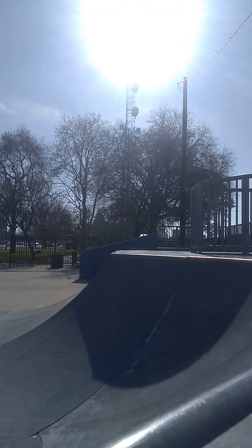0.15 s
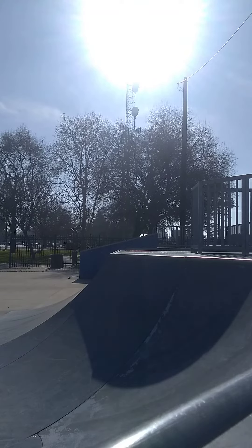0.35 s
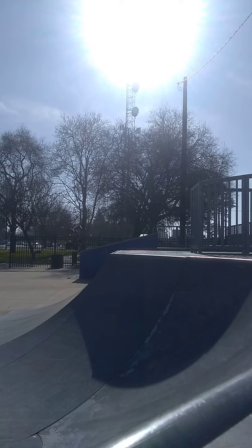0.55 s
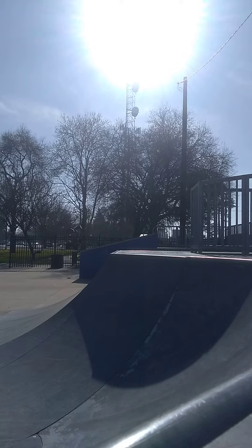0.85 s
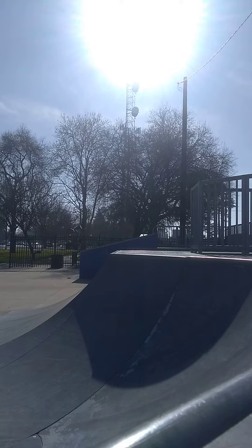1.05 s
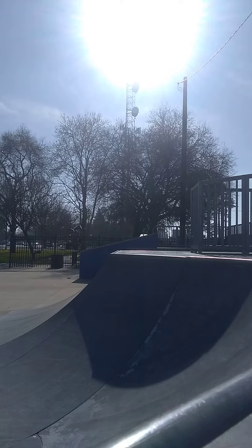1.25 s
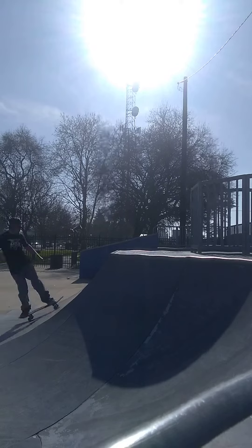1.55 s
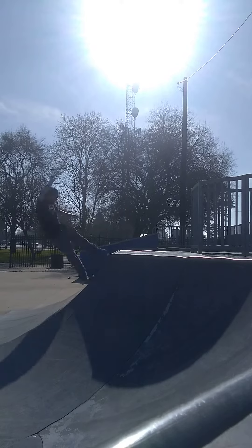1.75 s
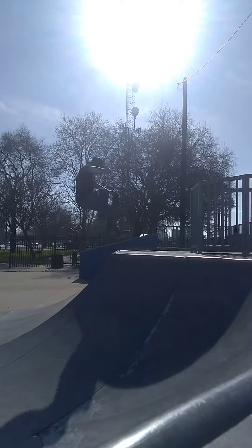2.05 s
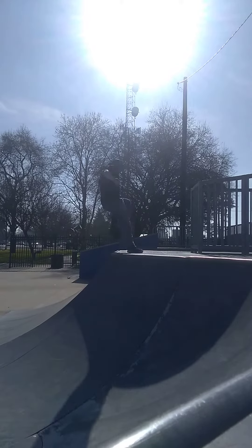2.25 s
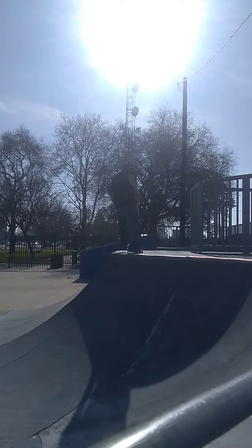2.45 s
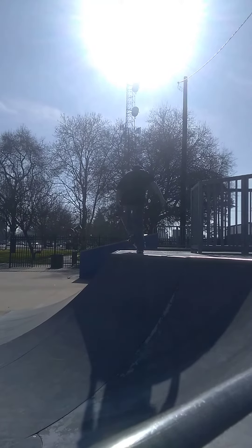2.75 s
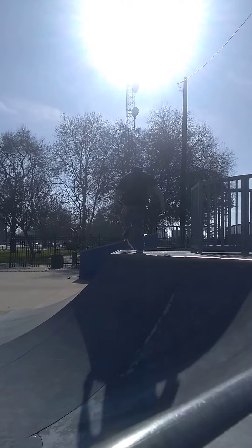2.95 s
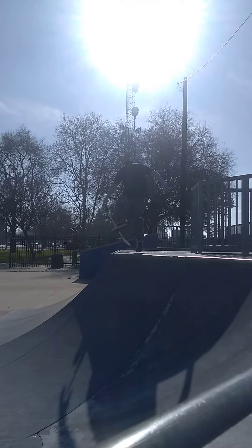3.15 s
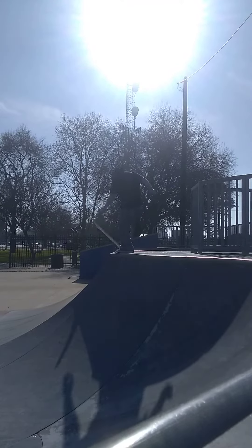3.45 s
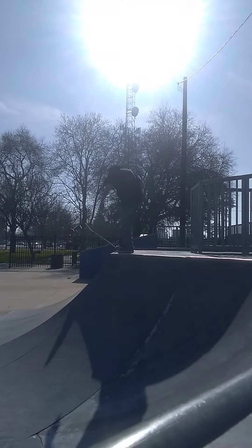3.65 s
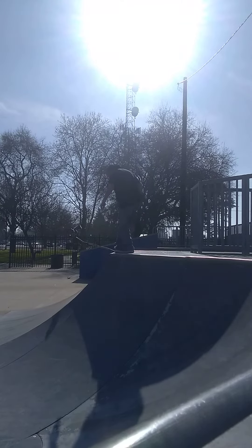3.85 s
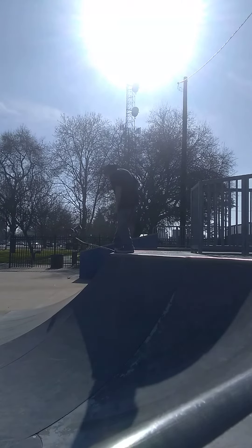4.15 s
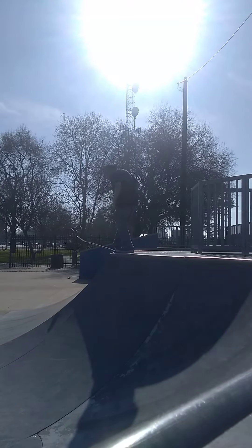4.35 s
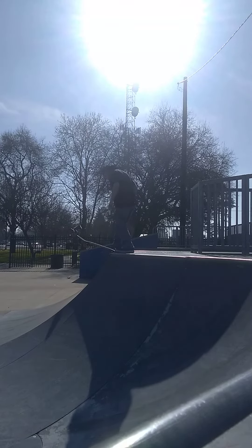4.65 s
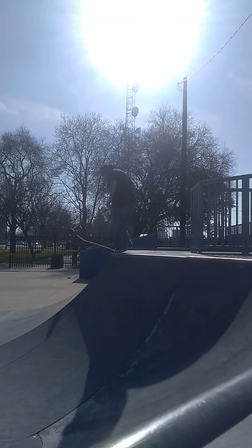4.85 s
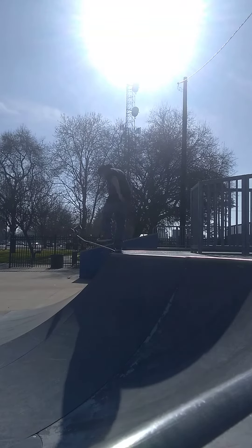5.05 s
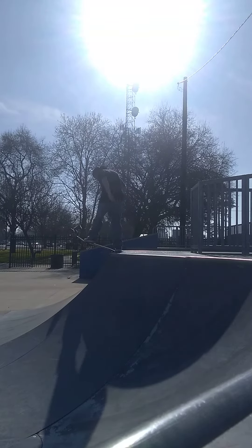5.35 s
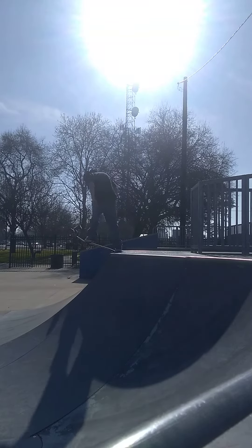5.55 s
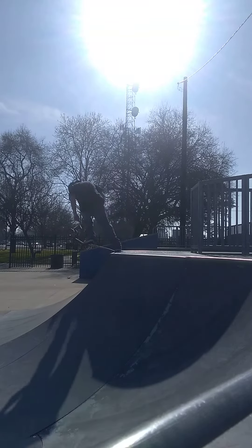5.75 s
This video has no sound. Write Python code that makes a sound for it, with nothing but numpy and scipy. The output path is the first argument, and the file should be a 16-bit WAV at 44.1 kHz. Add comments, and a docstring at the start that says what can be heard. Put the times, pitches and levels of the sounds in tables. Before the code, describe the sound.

A gritty wheel roar opens with dry plywood and metal truck clacks, then a hard hop. After a second short roll the board cracks onto hollow sheet steel with a quick rasp. Deep footfall booms lead to a ringing clatter on the deck, a quieter stretch of soft knocks, and a final roll and slam. Close stereo pickup on the metal rail, with a faint distant town in the open air.

```python
"""A skateboard crosses the concrete, hops, slams and grinds onto a steel ramp and rides up to the deck,
where the board clatters down; wheels approach again and hit the ramp at the end. Wheels are shaped noise,
the board is a set of ringing modes, and the steel sheets are randomly shaken modes that boom long after
every blow. A two-port microphone rests on the ramp's rail, with a distant town behind."""
import sys
import numpy as np
from scipy import signal
from scipy.fft import rfft, irfft, next_fast_len
from scipy.io import wavfile
from scipy.ndimage import uniform_filter1d

SR = 44100
rng = np.random.default_rng(int(sys.argv[2]) if len(sys.argv) > 2 else 0)


def inscribe(sig):
    """Save sig as 16-bit PCM at rate SR to the path in sys.argv[1].

    A 1-D sig is mono; a 2-D sig holds one channel per row.
    Samples are clipped to [-1, 1] before scaling.
    """
    pcm = np.round(np.clip(np.atleast_2d(sig).T, -1, 1) * 32767)
    wavfile.write(sys.argv[1], SR, pcm.astype(np.int16))


N = 273861
TIME = np.arange(N) / SR   # s


# wheels rolling close by: arrive_s, leave_s, rumble_db, roar_db, howl_db, whirr_db, hiss_db
PASSES = [(0.0, 0.54, -42.5, -37, -45, -52, -55.5), (1.082, 1.564, -40.5, -37.5, -44, -52, -49.5),
          (2.35, 2.691, -59.5, -69, -63, -82, -79.5), (5.799, 6.091, -41.5, -42, -41, -58.5, -54)]
APPROACH_DB_PER_S, LEAVE_DB_PER_S = 8, 47
HOWL_FADES, HISS_FADES = 1.6, 1.27   # times the roar's fade with distance; whirr fades like hiss


def rolling():
    """Gains of five layers: wheels draw near slowly and fall away fast, howl and treble more steeply."""
    near = [swell(arrive_s, leave_s, APPROACH_DB_PER_S, LEAVE_DB_PER_S)
            for arrive_s, leave_s, *_ in PASSES]
    layers_db = np.transpose(PASSES)[2:]
    fades = [1, 1, HOWL_FADES, HISS_FADES, HISS_FADES]
    return [together(from_db(db) * nearness ** fade for db, nearness in zip(levels_db, near))
            for levels_db, fade in zip(layers_db, fades)]


# colour of the rolling noise: pitch_hz, level_db (relative, per Hz)
WHEELS = [(40, -8), (90, 4), (170, 12.5), (260, -0.5), (430, -5.5), (600, -8.5), (850, -8.5), (1000, -10),
          (1400, -18.5), (1950, -30.5), (2800, -24.5), (4500, -42.5), (8000, -53), (14000, -67)]
# tones of the rail, set singing by wheels and board: pitch_hz, width_hz (half of one pass's), level_db
SINGING = [(631.5, 3.2, 9.5), (970, 1.3, 0.5), (1216, 5.5, 0.5)]


def wheels(roar_db=0.5, hiss_db=-2.0, rough_db=1.4, patchy_db=2.4, grain_db=0.6, singing_db=-19.0):
    """Hard wheels on a grainy, patchy surface roar bumpily, make the rail sing and hiss when near."""
    rumble, roar, howl, whirr, hiss = rolling()
    contact = noise(WHEELS, ripple_db=2.0)
    hollow = band(noise(WHEELS, ripple_db=2.0), 620, 1020)
    bumps_db = rough_db * flutter(70) + patchy_db * flutter(14)

    low = rumble * band(contact, 40, 300) + howl * hollow
    low = low + roar * (band(contact, 300, 620) + band(contact, 1020, 2000))
    low = low / np.std(band(contact, 650, 1700))
    low = low + from_db(singing_db) * roar * humming(SINGING, even_s=0.71, apart_db=-14.5)

    high = whirr * band(contact, 2000, 4200) + hiss * band(contact, 4200, 15000)
    high = high / np.std(band(contact, 2400, 7000))
    gritty_db = bumps_db / 2 + grain_db * flutter(550)
    return low * from_db(roar_db + bumps_db) + high * from_db(hiss_db + gritty_db)


def grit(per_s=55, grit_db=-4.0, size_db=3.5):
    """Grains and pits under the wheels tick against the board at random, louder with the roar."""
    roar = rolling()[1]
    sizes = from_db(size_db * np.minimum(rng.exponential(1, N), 3)) * rng.choice([-1, 1], N)
    hits = (rng.random(N) < per_s / SR) * sizes * roar * from_db(grit_db)
    shares_db = [10, 0.0, -11.5, -18.5]   # per zone
    return sum(from_db(db) * board(hits, *zone) for zone, db in zip(ZONES, shares_db))


# the board's plywood and trucks: pitch_hz, level_db, t60_s
BOARD = [(278, -15, 0.027), (450, -6.5, 0.071), (553, -14.5, 0.056), (692, -7.5, 0.055), (1120, -3, 0.021),
         (1180, 0.5, 0.015), (1450, -4, 0.017), (2457, -21, 0.11), (2706, -16.5, 0.089), (2872, -4, 0.011),
         (2995, -19, 0.15), (3270, -15, 0.029), (4330, -1.5, 0.0052), (6500, -8, 0.0094),
         (8570, -14, 0.017)]
# ranges of thump, knock, truck ring and tick (or crack): low_hz, high_hz
ZONES = [(120, 750), (750, 1900), (1900, 4000), (4500, 15000)]


def board(hits, low_hz, high_hz, skirt=0.69):
    """Contacts ring the board's modes within one range of pitch, with alternating sign."""
    rings = sum((-1) ** k * from_db(db) * ring(hits, hz, t60)
                for k, (hz, db, t60) in enumerate(BOARD) if low_hz <= hz < high_hz)
    return band(rings, skirt * low_hz, high_hz, order=2)


# the board on open concrete: start_s, thump_db, wooden knock_db, truck ring_db, tick_db
CLACKS = [(0.08, -36, -29, -34, -44), (0.095, -32.5, -28.5, -45, -40), (0.137, -22, -29, -46, -42),
          (.173, -39.5, -39, -39, -45), (0.208, -42, -28.5, -29, -34.5), (0.223, -19.5, -23, -27, -35.5),
          (.334, -33.5, -16, -14.5, -37.5), (0.346, -42, -25, -34, -46), (.670, -15, -11.5, -20.5, -32),
          (.683, -27, -20.5, -21.5, -57), (0.743, -11.5, -20.5, -25.5, -34.5),
          (.753, -11, -13.5, -14.5, -47), (0.759, -17, -17.5, -24, -46), (0.768, -23, -24, -15, -39)]
FLEX_S, THUMP_LAG_S = 0.0016, 0.0032   # after the tick the plywood knocks, then thumps


def clacks(crunch_db=-7.5, crunch_t60=0.015, rail_db=-26.0, rail_t60=1.5):
    """Tail and wheels strike concrete: board rings, grit crunches, the park scatters it, the rail sings."""
    times, thump_db, knock_db, ring_db, tick_db = np.transpose(CLACKS)
    parts = [(THUMP_LAG_S, thump_db), (FLEX_S, knock_db), (0, ring_db), (0, tick_db)]
    echoes = [(-16.5, 1.0), (-22.0, 0.8), (-22.0, 0.41), (-17.5, 0.18)]   # per zone: level_db, t60_s
    scatter = noise(STEEL, ripple_db=5.0)
    out = 0
    for zone, (lag_s, level_db), (echo_db, t60) in zip(ZONES, parts, echoes):
        hits = clicks(times + lag_s, from_db(level_db))
        crunch = from_db(crunch_db) * dying(hits, crunch_t60, rise_s=0.00033)
        echo = from_db(echo_db) * dying(hits, t60, rise_s=0.0036)
        out = out + board(hits, *zone) + (crunch + echo) * rms_one(band(scatter, *zone))
    rail = dying(clicks(times, from_db(knock_db + rail_db)), rail_t60, rise_s=0.019)
    return out + rail * humming(SINGING, even_s=0.2, apart_db=-24.5)


# clean, square contacts, plywood low and trucks high: start_s, peak_db, pitch_hz, width_hz
TOCKS = [(.3345, -17.5, 3160, 950), (.344, -18.5, 3070, 600), (0.6715, -4.5, 1354, 468),
         (0.7432, -8, 1240, 414), (.745, -12, 560, 422), (0.7518, -17.5, 3000, 700),
         (1.4206, -15, 2760, 370), (1.4253, -7, 2830, 381), (1.573, -29.5, 2850, 500),
         (1.934, -40, 1230, 600), (3.304, -35, 1330, 600), (3.331, -25.5, 1450, 803),
         (3.3789, -14.5, 1115, 623), (3.523, -20.5, 537, 300.5), (3.687, -33, 1280, 394),
         (3.812, -44, 1630, 300), (3.847, -38.5, 1414, 600), (3.86, -58, 2840, 300),
         (5.976, -24.5, 1000, 600), (6.03, -12, 369, 300), (6.04, -16, 1300, 798), (6.0395, -26, 3140, 600)]


def tocks():
    """A cluster of close board modes swells and dies within a few milliseconds: a dry, pitched knock."""
    out = 0
    for start_s, peak_db, hz, width_hz in TOCKS:
        click = clicks(np.array([start_s]), [1])
        note = band(click, hz - width_hz / 2, hz + width_hz / 2, order=3)
        out = out + from_db(peak_db) * note / np.abs(note).max()
    return out


# the whole board bends under the rider's weight with a hollow pop: start_s, level_db, pitch_hz, t60_s
POPS = [(0.674, -14, 224, 0.025), (6.038, -9.5, 222, 0.065)]


def pops():
    """The board's lowest bending note, damped at once by the rider's feet."""
    return sum(ring(clicks(np.array([start_s]), from_db([db])), hz, t60) for start_s, db, hz, t60 in POPS)


# trucks grind over the steel edge: start_s, end_s, level_db, fade_db_per_s
GRINDS = [(1.425, 1.421, -22.5, 900), (1.439, 1.5, -37.5, 117.5)]
GRIND_BITE_DB_PER_S = 2999


def grinding(slips_per_s=900, uneven_db=7.0, judder_db=5.5, rasp_db=-20.5):
    """Metal sticks and slips on steel: dense, uneven tiny jolts ring the trucks and rasp above them."""
    sizes_db = uneven_db * rng.uniform(-1.6, 1, N) + judder_db * flutter(150)
    slips = (rng.random(N) < slips_per_s / SR) * rng.choice([-1, 1], N) * from_db(sizes_db)
    pressure = together(from_db(db) * swell(start_s, end_s, GRIND_BITE_DB_PER_S, fade)
                        for start_s, end_s, db, fade in GRINDS)
    trucks = rms_one(band(board(slips, *ZONES[2]), 2400, 3700, order=2))
    rasp = rms_one(band(slips, 4400, 6000, order=2))
    return pressure * (trucks + from_db(rasp_db) * rasp)


# blows on the ramp: start_s, strength_db, then relative to it knock_db, ring_db, crack_db,
# first touch_db, and place (0 riding sheet to 1 deck plate)
SLAMS = [(1.424, -21.5, 8.5, 13.5, 14, -2, .15), (1.439, -25, 5.5, 14, 10.5, -9.5, .15),
         (1.471, -28.5, 1.5, -1, 9, -10.5, 0.17), (1.499, -29.5, 5.5, 11.5, 8, -7, 0.12),
         (1.514, -31.5, 4.5, 12.5, 12, -11.5, 0.11), (1.575, -27.5, 4, -3, -9, -9, 0.11),
         (1.934, -34, 1, -5, -3, 2, 0.15), (2.259, -52, -17, 6, 2.5, 1.5, 0.9),
         (2.3, -46.5, 1, 6.5, 0, 2.5, 0.63), (2.351, -48.5, 6.5, -5, 9.5, 2, .8),
         (2.373, -45, 5, -3, 3, -3.5, 0.73), (3.305, -50, 8.5, 7, 0, -12, 0.88),
         (3.329, -30.5, 5, 4, 3, -7, 0.83), (3.380, -23.5, 2.5, 0, 0, 1.5, 0.83),
         (3.393, -30.5, 4.5, 3, -8, -8.5, .8), (3.432, -32, -1, 1, 4, 0.5, 0.49),
         (3.467, -35, -6, -14, -12, -6.5, 0.56), (3.526, -34, -10.5, -8.5, -6, -5, 0.42),
         (3.569, -39, -2, -3, -6, -6.5, 0.74), (3.686, -36.5, 0.5, -3, -6, -9, 1),
         (3.728, -49, 0.5, -6, 4, -9, .8), (3.813, -48.5, 3.5, -7, 2, -8, 0.82),
         (3.848, -36.5, -1, -10, -7, 1.5, 0.68), (4.074, -50, -1, -2, -1.5, -5.5, .8),
         (5.274, -44, 7.5, 4, 7, -16, 0.97), (5.514, -45.5, 6, 0, 4, -6, .6),
         (5.621, -36.5, 2.5, 1, 3, -4, .5), (5.806, -49.5, 9.5, 7, 14, 3, 0.59),
         (5.82, -48, 5, 4, 13, -8, .5), (5.975, -39, 7, -6, 3, -5, .5), (6.04, -18, 2, -2, -0.5, -6, 0.41),
         (6.055, -25.5, 0.5, 2, -11, -4, 0.36), (6.11, -31.5, -10, -10, -14, -7, .3)]
# thud, knock, ring and crack of a blow: level_db, first touch_db
SLAM_PARTS = [(2, -2.5), (-7, -10.5), (-14, -18.5), (-24, -6.5)]
# colour of the dense steel wash, also of the park's scatter: pitch_hz, level_db (relative, per Hz)
STEEL = [(100, -13), (155, 2), (240, 4.5), (330, 10.5), (430, 5.5), (550, 4), (660, -4.5), (1020, -1.5),
         (1500, -7), (2050, -15), (2550, -7.5), (2900, -12), (3400, -16.5), (4000, -20), (4700, -26),
         (7000, -38.5), (10000, -46.5), (14000, -61)]
TOUCH_LEAD_S = 0.009   # one pair of wheels touches just before the full blow


def landing(times, level_db, touch_db):
    """Each blow is a first touch, then the full hit."""
    full = clicks(times, from_db(level_db))
    return full + clicks(times - TOUCH_LEAD_S, from_db(level_db + touch_db))


def slams(strike_db=1.0, strike_t60=0.05, snap_db=-5.5, snap_t60=0.011):
    """The board strikes steel: a hard crack, then a wash of dense sheet modes whose highs die first."""
    times, strength_db, knock_db, ring_db, crack_db, early_db, _ = np.transpose(SLAMS)
    colours_db = [0, knock_db, ring_db, crack_db]
    # per zone: board_db, wash_db, wash t60_s
    shares = [(1.2, -2, 1.0), (1.8, -8.5, 0.7), (6.3, -8, 0.48), (3, -3.5, 0.15)]
    steel = noise(STEEL, ripple_db=2.0)
    out = 0
    for zone, colour_db, (part_db, touch_db), (board_db, wash_db, t60) in zip(
            ZONES, colours_db, SLAM_PARTS, shares):
        low_hz, high_hz = zone
        hits = landing(times, strength_db + part_db + colour_db, touch_db + early_db)
        snap = from_db(snap_db) * dying(hits, snap_t60, rise_s=0.000097)   # the instant of contact
        strike = from_db(strike_db) * dying(hits, strike_t60, rise_s=0.0011)
        tail = from_db(wash_db) * dying(hits, t60, rise_s=0.0024)
        wash = together([snap, strike, tail]) * rms_one(band(steel, *zone))
        out = out + from_db(board_db) * board(hits, *zone)
        out = out + band(wash, low_hz / 2, 2 * high_hz, order=2)
    return out


# trucks and tail hit the steel squarely and draw a note: start_s, level_db, favoured pitch_hz
KNOCKS = [(1.426, -17.5, 418), (3.334, -29, 1410), (3.38, -14, 1050), (3.394, -17.5, 417),
          (3.425, -15, 557), (3.459, -14.5, 480), (3.524, -18.5, 554), (6.051, -23, 330)]
# what the steel rings with under such a knock: pitch_hz, level_db, t60_s
PLATE = [(343, -1, 0.11), (436.6, 4, 0.46), (487, -7, .13), (541.7, -5, 0.95), (780, -4.5, .12),
         (1040, -1, 0.055), (1390, 0, 0.053)]
FOCUS_DB_PER_OCTAVE = 51.5   # modes away from the favoured pitch answer less


def knocks():
    """Each square knock rings the steel's modes, most of all those near one pitch."""
    times, level_db, favoured_hz = np.transpose(KNOCKS)
    out = 0
    for hz, db, t60 in PLATE:
        off_pitch_db = FOCUS_DB_PER_OCTAVE * np.abs(np.log2(hz / favoured_hz))
        out = out + ring(clicks(times, from_db(level_db + db - off_pitch_db)), hz, t60)
    return out


# the rider's weight comes down on the ramp: start_s, boom_db
FOOTFALLS = [(1.43, -12), (2.02, -26), (2.332, -10.5), (2.66, -15.5), (2.919, -13.5), (3.243, -12.5),
             (3.567, -12.5), (4.149, -17.5), (4.679, -19.5), (5.08, -19), (6.05, -15)]
FOOT_RISE_S, FOOT_T60_S = 0.0503, 2.13
# spells of steady shaking, as when wheels run somewhere on the steel:
# start_s, end_s, frame_db, riding sheet_db, deck plate_db, fade_db_per_s
RIDES = [(0.0, .22, -29.5, -30.5, -56, 26), (1.459, 2.075, -19, -25, -32, 8.5),
         (3.756, 4.91, -23, -38, -31, 27), (5.32, 6.21, -22.5, -47, -44, 9)]
RIDE_SWELL_DB_PER_S = 254.5
# modes of the ramp's frame: pitch_hz, width_hz (half the bandwidth of one pass), level_db (relative)
FRAME = [(66.4, 10, -11), (83.5, 27, -13), (109.1, 12.7, 5), (132, 11, -17), (149, 16.5, -5.5),
         (160.4, 17, -10)]
# modes of the riding sheet, same columns: pitch_hz, width_hz, level_db
SHEET = [(184.8, 11, 2.5), (239.5, 6, 4.5), (260, 20, -15), (285.4, 7, 2)]
# modes of the deck plate, same columns: pitch_hz, width_hz, level_db
DECK = [(335.7, 18, -0.5), (394.3, 12, -1.5), (420.7, 8.4, 1), (459.5, 9.2, -12.5), (492.3, 9.9, -12.5),
        (544.2, 3, -10)]


def ramp(frame_rest_db=-36.5, sheet_rest_db=-51.0, deck_rest_db=-55.0, foot_sheet_db=-25.0,
         blow_sheet_db=2.5, blow_deck_db=5.0, sheet_t60=0.99, deck_t60=0.64, build_s=0.0092):
    """The hollow frame booms under the rider's weight; blows and wheels set sheet and deck droning."""
    steps_s, steps_db = np.transpose(FOOTFALLS)
    weight = dying(clicks(steps_s, from_db(steps_db)), FOOT_T60_S, FOOT_RISE_S)

    times, strength_db, *_, on_deck = np.transpose(SLAMS)
    sheet_hits = clicks(times, from_db(strength_db + blow_sheet_db) * (1 - on_deck))
    deck_hits = clicks(times, from_db(strength_db + blow_deck_db) * on_deck)
    sheet_blows = dying(sheet_hits, sheet_t60, build_s)
    deck_blows = dying(deck_hits, deck_t60, build_s)

    frame_ride, sheet_ride, deck_ride = together(
        from_db(levels_db)[:, None] * swell(start_s, end_s, RIDE_SWELL_DB_PER_S, fade)
        for start_s, end_s, *levels_db, fade in RIDES)
    boom = together([from_db(frame_rest_db), frame_ride, weight])
    sheet = together([from_db(sheet_rest_db), sheet_ride, sheet_blows, from_db(foot_sheet_db) * weight])
    deck = together([from_db(deck_rest_db), deck_ride, deck_blows])
    return (boom * humming(FRAME, even_s=0.11, apart_db=-21.0)
            + sheet * humming(SHEET, even_s=0.021, apart_db=-12.0)
            + deck * humming(DECK, even_s=1.0, apart_db=-25.5))


def humming(modes, even_s, apart_db):
    """Steel modes shaken at random, each applied twice for steep skirts; steady in overall level."""
    shaking = rng.standard_normal(N) + from_db(apart_db) * rng.standard_normal((2, N))
    out = 0
    for k, (hz, width_hz, level_db) in enumerate(modes):
        peak = signal.tf2sos(*signal.iirpeak(hz, hz / (2 * width_hz), fs=SR))
        shifted = np.roll(shaking, k * SR // 2, axis=1)   # each mode hears another stretch of the noise
        out = out + from_db(level_db) * signal.sosfilt(np.vstack([peak, peak]), shifted)
    power = uniform_filter1d(np.mean(out ** 2, axis=0), int(even_s * SR))
    return out / np.sqrt(power + 1e-12)


# colour of the distant town: pitch_hz, level_db (relative, per Hz)
PARK = [(40, -2), (150, 3.5), (500, -9), (1000, -11.5), (2000, -28.5), (4000, -42.5), (8000, -53),
        (14000, -57)]


def distant_town(level_db=-45.0):
    """Far-off sounds merge into steady noise with little treble."""
    return from_db(level_db) * noise(PARK)


# how alike noise is in left and right: pitch_hz, likeness (0 unrelated to 1 the same)
LIKENESS = [(60, 0.65), (220, 0.38), (500, 0.93), (1100, 1), (1750, 0.67), (3000, 0.98), (7000, 0.78),
            (12000, 0.18)]


def noise(spectrum, ripple_db=0.0, mode_gap_hz=14):
    """Stereo noise of a given colour, partly alike left and right; crowded modes ripple its spectrum."""
    size = next_fast_len(N)
    hz = np.arange(size // 2 + 1) * SR / size
    modes = np.interp(hz / mode_gap_hz, np.arange(size), rng.standard_normal(size))
    colour = from_db(at_hz(spectrum, hz) + ripple_db * modes)
    mid, side = rfft(rng.standard_normal((2, size))) * colour
    alike = at_hz(LIKENESS, hz)
    both = np.sqrt(1 + alike) * mid + np.sqrt(1 - alike) * side * [[1], [-1]]
    return rms_one(irfft(both, size)[:, :N])


# left minus right level: pitch_hz, level_db
BALANCE = [(100, 2), (350, 2), (650, 0.5), (900, 0.8), (1300, -0.5), (3000, -1), (10000, -1.5)]


def stereo(x, lead):
    """Left and right differ in phase and strength; stereo widening leaves the bass nearly opposed."""
    pad = SR // 10
    size = next_fast_len(N + 2 * pad)
    hz = np.arange(size // 2 + 1) * SR / size
    left, right = rfft(np.pad(x, [(0, 0), (pad, pad)], "reflect", reflect_type="odd"), size)
    tilt = from_db(at_hz(BALANCE, hz) / 2)
    turn = np.exp(-1j * np.interp(hz, *np.transpose(lead)))
    return irfft([left * tilt, right * turn / tilt], size)[:, pad:pad + N]


def from_db(db):
    """Decibels to gain."""
    return 10 ** (np.asarray(db) / 20)


def rms_one(x):
    """Scale to unit rms."""
    return x / np.sqrt(np.mean(x ** 2) + 1e-20)


def at_hz(points, hz):
    """Read a table on a log-frequency axis."""
    table = np.array(points)
    return np.interp(np.log(hz + 1), np.log(table[:, 0]), table[:, 1])


def band(x, low_hz, high_hz, order=4):
    """Causal band-pass."""
    edges_hz = [low_hz, min(high_hz, .45 * SR)]
    return signal.sosfilt(signal.butter(order, edges_hz, "band", fs=SR, output="sos"), x + 1e-18)


def flutter(per_s):
    """Random wavering, with per_s fresh values a second joined by straight lines."""
    return np.interp(TIME * per_s, np.arange(N), rng.standard_normal(N))


def ring(x, hz, t60):
    """A unit click sets a decaying sine of height 1 ringing."""
    r = from_db(-60 / (t60 * SR))
    w = 2 * np.pi * hz / SR
    return signal.lfilter([0, np.sin(w)], [1, -2 * r * np.cos(w), r * r], x + 1e-18)


def clicks(times, gains):
    """One impulse for each contact."""
    return np.bincount(np.round(times * SR).astype(int), gains, minlength=N)[:N]


def dying(hits, t60, rise_s):
    """Envelope of the energy that each hit leaves behind: it builds up, then leaks away."""
    keep = from_db(-120 / (t60 * SR))   # energy, so twice the decibels
    lag = np.exp(-1 / (rise_s * SR))
    energy = signal.lfilter([1], [1, -keep], hits ** 2 + 1e-18)
    return np.sqrt(signal.lfilter([1 - lag], [1, -lag], energy))


def swell(start_s, end_s, rise_db_per_s, fall_db_per_s):
    """Gain that rises until the start, holds to the end and fades."""
    before_s, after_s = np.maximum(start_s - TIME, 0), np.maximum(TIME - end_s, 0)
    return from_db(-rise_db_per_s * before_s - fall_db_per_s * after_s)


def together(gains):
    """Unrelated sounds add in power."""
    return np.sqrt(sum(g ** 2 for g in gains))


# phase by which left leads right in the widened stereo, for sound through the air: pitch_hz, lead_radians
AIR_LEAD = [(0, 3.14), (170, 3.14), (310, .3), (1500, -.15), (2050, -3.14), (2900, -6.2), (4150, -9.42),
            (5000, -12.5), (14000, -38.5)]
# the same for sound through the rail: pitch_hz, lead_radians
RAIL_LEAD = [(0, 3.14), (260, 3.85), (430, 4.5), (800, 6.1), (1500, 6.1), (2050, 3.14), (2900, .1),
             (4150, -3.14), (5000, -6.2), (14000, -32.2)]


def scene():
    """Wheels, board and town come through the air, the ramp through the rail; pops are alike left and right."""
    through_air = wheels() + grit() + clacks() + tocks() + grinding() + distant_town()
    through_rail = ramp() + slams() + knocks()
    return stereo(through_air, AIR_LEAD) + stereo(through_rail, RAIL_LEAD) + pops()


CUTOFF_HZ, FADE_S = 14500, 0.004


def record(dry):
    """The microphone drops the deepest bass, the highest peaks are rounded, the end fades, the top is cut."""
    thin = signal.sosfilt(signal.butter(2, 42, "high", fs=SR, output="sos"), dry)
    rounded = thin / (1 + (thin / .92) ** 10) ** (1 / 10)
    faded = rounded * np.minimum(1, TIME[::-1] / FADE_S)
    return signal.sosfilt(signal.ellip(10, .1, 90, CUTOFF_HZ, fs=SR, output="sos"), faded)


dry = scene()
out = record(dry)
inscribe(out)
```